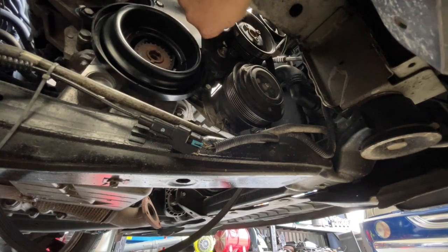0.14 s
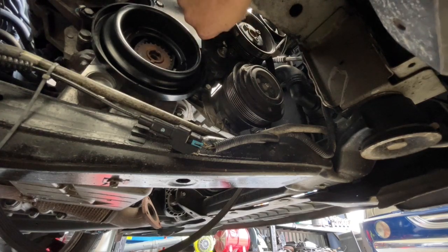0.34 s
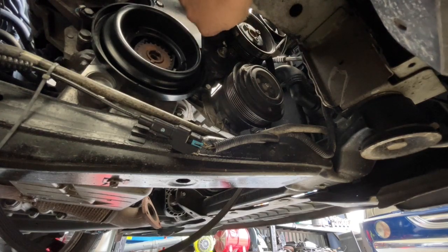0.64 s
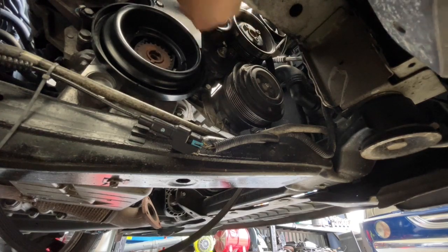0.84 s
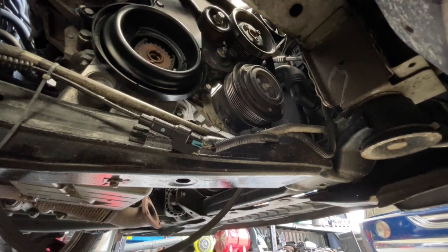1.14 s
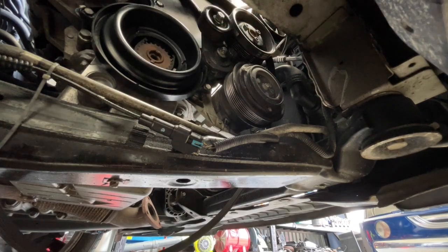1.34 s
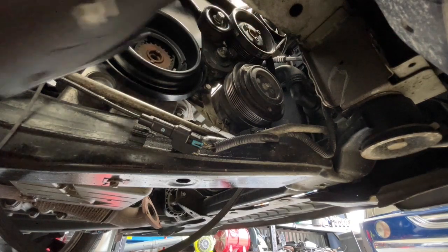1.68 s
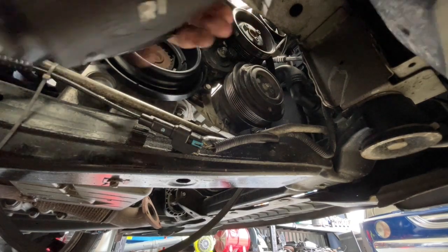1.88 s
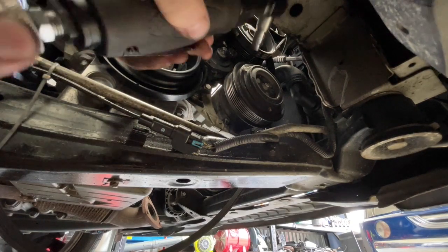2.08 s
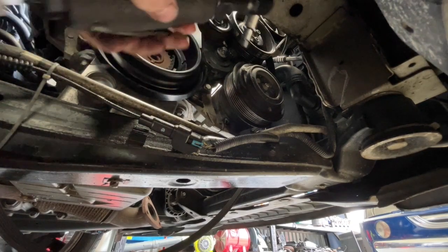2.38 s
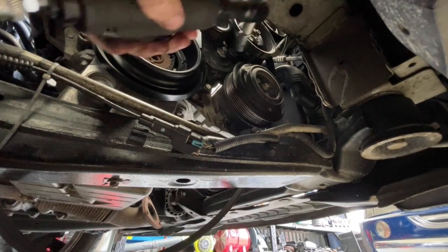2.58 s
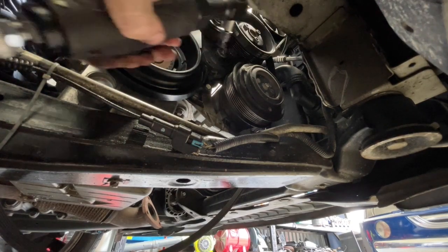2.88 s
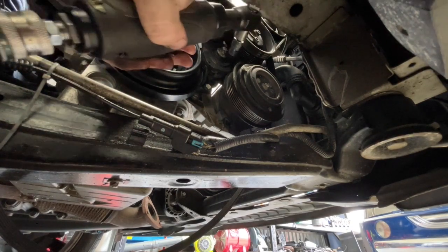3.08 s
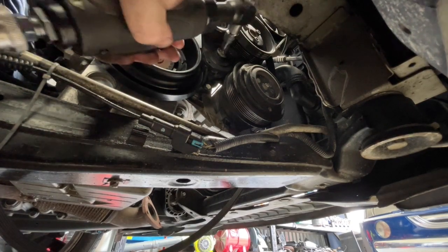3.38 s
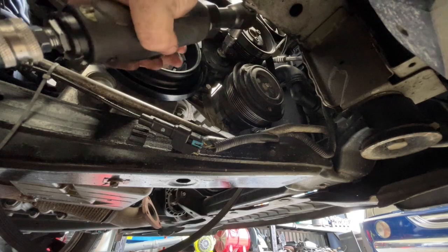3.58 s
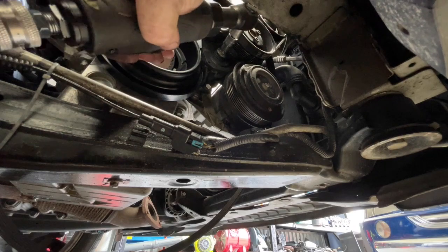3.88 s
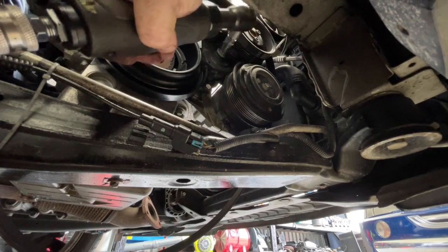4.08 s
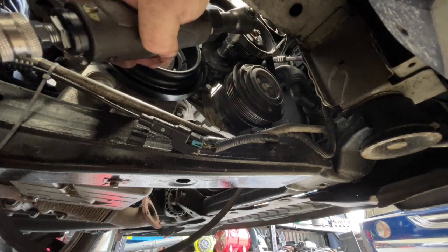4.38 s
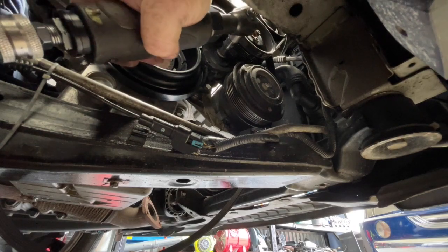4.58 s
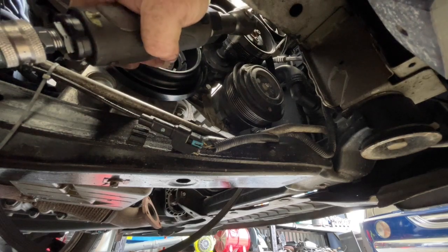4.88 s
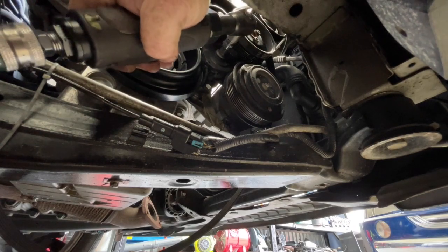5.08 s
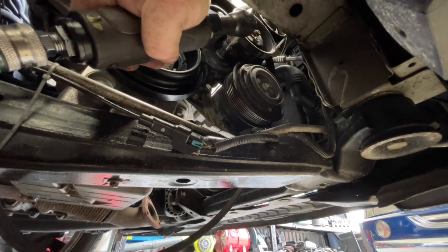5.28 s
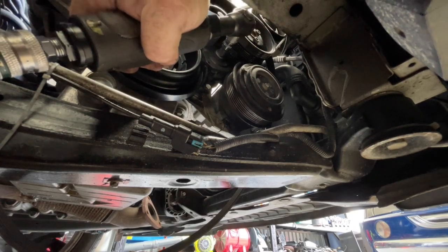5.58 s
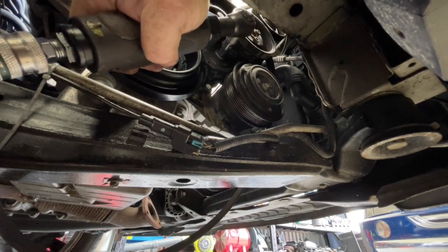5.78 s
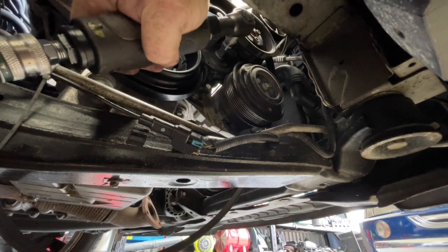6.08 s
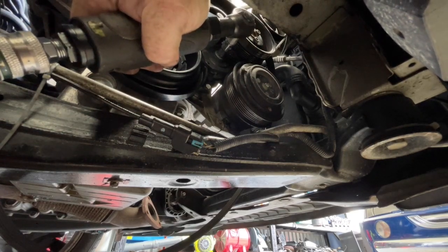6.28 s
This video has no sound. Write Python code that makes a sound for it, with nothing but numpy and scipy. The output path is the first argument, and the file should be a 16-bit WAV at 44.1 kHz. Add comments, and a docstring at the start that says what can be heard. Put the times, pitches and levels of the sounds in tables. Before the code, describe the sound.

A pneumatic ratchet works on a bolt beneath a car, close to the microphone and a little to the left. First come soft rustles, hose bumps and small clicks over a low garage hum, then a sharp steel clack and a few dull kicks of the motor. Three quick bursts of air hiss and whine follow, each coasting down, and finally a sustained run whose pitch droops as its hiss eases.

```python
"""A pneumatic ratchet undoes a bolt under a car, close up and a little to the left.
Its vane motor chops air into hiss and whine: one loaded burst and two free ones, each coasting down
with a falling whoop, then a long run whose pitch sags while its hiss gradually fades.
Before that, sleeve and hose rub past, the socket clacks onto the ringing bolt and the trigger is
feathered. Underneath lies a low workshop drone that sinks away once the motor runs."""
import sys
import numpy as np
from scipy import signal
from scipy.fft import rfft, irfft
from scipy.io import wavfile
from scipy.ndimage import uniform_filter1d

SR = 44100
rng = np.random.default_rng(int(sys.argv[2]) if len(sys.argv) > 2 else 0)


def file_out(sig):
    """Save sig as 16-bit WAV at sys.argv[1]."""
    # one column per channel
    cols = np.atleast_2d(sig).T
    # limit, then scale
    lim = np.clip(cols, -1, 1)
    pcm = np.round(lim * 32767).astype(np.int16)
    wavfile.write(sys.argv[1], SR, pcm)


N = 283959
T = np.arange(N) / SR
HZ = np.fft.rfftfreq(N, 1 / SR)

VANES_PER_CRANK, LOADED_WAVER = 23.2, .009  # gearing; rms share of speed wobble at full load
# Trigger pulls: (press [s], release [s], valve opening [s], spin-up [s], spin-up curve [exponent],
# top vane rate before sag [Hz], base hiss [dB], base chuff [dB], opening surge [dB], base whoop [dB])
TRIGGER_PULLS = [(3.866, 4.033, 0.0069, 0.038, 1.2, 1256, -13.5, -24, 7.5, -10),
                 (4.326, 4.587, 0.0053, 0.044, 1.65, 1876, -14, -27.5, 11, -20.5),
                 (4.722, 4.979, 0.03, .037, 1.55, 1815, -12, -25.5, 4, -18.5),
                 (5.062, 6.5, 0.04, 0.038, 1.6, 1765, -15, -29.5, 3.5, -15)]


def ratchet():
    """The hero sound: air spins a vane motor, each pull taking over from the one dying away."""
    vane_hz, hiss, chuff, whine_gain, whoop_gain = np.max([pull(*row) for row in TRIGGER_PULLS], axis=0)
    load = np.clip((1750 - vane_hz) / 550, .2, 1)  # a slow motor is a labouring one
    cycles = np.cumsum(vane_hz * (1 + LOADED_WAVER * load * wander(26))) / SR  # one per vane
    crank = cycles / VANES_PER_CRANK % 1
    air = exhaust(hiss, chuff, cycles, crank, load)
    snaps = pawl(chuff, crank, load)
    highs = whine(whine_gain, vane_hz, cycles, load)
    lows = whoop(whoop_gain, cycles)
    direct = air + snaps + air_blasts()
    return from_left(direct + bay(highs, wet_db=-2.5, decay_s=.011) + bay(lows, wet_db=-9.5, decay_s=.02))


VALVE_CURVE, SURGE_S = 2.07, .08  # the valve cracks open slowly, then all at once with a surge
START_HZ, STALL_HZ = 111, 170  # vane rate at the first gulp of air; rate below which the tone dies
SETTLE_S, SETTLE_LIMIT = 1.0, .65  # during a pull the pitch sags and the air noise fades, then both hold
SAG_SHARE, HISS_FADE_DB, CHUFF_FADE_DB = .225, -11, -4.5  # per unit of settling
COAST_S, WHOOP_RISE_S, HISS_FALL_DB_PER_S, CHUFF_FALL_DB_PER_S = .042, .0068, 449, 282  # on release
# Body of the vane tone under air: (vane rate [Hz], level against the hiss [dB])
TONE_UNDER_AIR = [(150, -25), (350, -10.5), (660, -9), (930, -10.5), (1060, -49.5), (1210, -16.5),
                  (1450, -38.5), (1640, -33), (1780, -18), (1830, -19.5)]
# Body of the vane tone when coasting: (vane rate [Hz], level against the base whoop [dB])
TONE_COASTING = [(130, -44), (250, -25), (430, -10.5), (800, 1.5), (1100, 3.5), (1750, -8)]


def pull(press, release, valve_s, spin_up_s, spin_curve, top_hz, hiss_db, chuff_db, surge_db, whoop_db):
    """Pitch and gain envelopes of one pull: the valve opens, the rotor spins up, sags and coasts."""
    held = np.clip(T - press, 0, release - press)
    coasted = np.maximum(T - release, 0)
    valve = 1 - np.exp(-(held / valve_s) ** VALVE_CURVE)
    settled = np.minimum(1 - np.exp(-held / SETTLE_S), SETTLE_LIMIT)
    spin = 1 - np.exp(-(held / spin_up_s) ** spin_curve)
    driven_hz = (START_HZ + (top_hz - START_HZ) * spin) * (1 - SAG_SHARE * settled)
    vane_hz = (T > press) * driven_hz * np.exp(-coasted / COAST_S)
    air = valve * amp(surge_db * np.exp(-held / SURGE_S))
    hiss = air * amp(hiss_db + HISS_FADE_DB * settled - HISS_FALL_DB_PER_S * coasted)
    chuff = air * amp(chuff_db + CHUFF_FADE_DB * settled - CHUFF_FALL_DB_PER_S * coasted)
    whine_gain = hiss * spin ** 3  # comes in only near top speed
    shut = 1 - np.exp(-(coasted / WHOOP_RISE_S) ** 2)
    driven = (1 - shut) * hiss * amp(curve(TONE_UNDER_AIR, vane_hz))
    coasting = shut * amp(whoop_db + curve(TONE_COASTING, vane_hz))
    whoop_gain = (driven + coasting) * np.minimum(vane_hz / STALL_HZ, 1) ** 2
    return vane_hz, hiss, chuff, whine_gain, whoop_gain


# Bright air leaving the muffler: (frequency [Hz], relative level [dB])
EXHAUST_EQ = [(100, -18), (500, -21.5), (1200, -16), (2000, -13), (2500, -7), (3500, -9.5), (4150, -8),
              (4900, -11.5), (7200, -9.5), (8600, -4), (10700, 0), (11700, -3), (12500, -14.5),
              (13300, -32.5)]


def exhaust(hiss, chuff, cycles, crank, load):
    """Each vane lets out a puff, hiss on top and chuff below; the crank loads the motor once a turn."""
    stroke = 1 + .23 * load * np.cos(2 * np.pi * crank)
    puffs = unit(1 + .13 * np.cos(2 * np.pi * cycles)) * amp(.5 * wander(310)) * stroke
    top = hiss * noise(eq(EXHAUST_EQ) * band(5400, 26000))
    body = chuff * amp(1) * noise(eq(EXHAUST_EQ) * band(43, 6200))
    return (top + body) * puffs


# Peaks and dips that the vane overtones glide through: (frequency [Hz], relative level [dB])
WHINE_EQ = [(1800, -25), (2200, -9), (2430, -43), (2700, -6), (3050, -24), (3200, -23.5), (3450, -34),
            (3620, -27), (3800, -24), (4700, -28), (5300, -33), (6100, -21), (7400, -30), (8500, -10),
            (9100, -16.5), (9700, -12), (12500, -61)]


def whine(gain, vane_hz, cycles, load):
    """At speed the puffs fuse into a whine; its overtones swell and fade gliding through fixed peaks."""
    overtones = sum(eq(WHINE_EQ, k * vane_hz) * np.cos(2 * np.pi * k * cycles) for k in range(2, 7))
    # four unequal vanes add faint lines at multiples of the shaft speed
    shaft = sum(amp(-31 - 2.5 * np.log2(k)) * np.cos(2 * np.pi * (k * cycles / 4 + rng.random()))
                for k in range(2, 30) if k % 4)
    bite = amp(2.9 * wander(34) + 3.4 * (load + .5))  # flickers, and is louder under load
    return gain * (np.sqrt(2) * overtones + shaft) * bite


FLOOR_ECHO_S, FLOOR_ECHO_DB = .017, -18


def whoop(gain, cycles):
    """Starting and coasting, the rotor pumps round pulses: a gliding tone that slaps off the floor."""
    pulses = sum(amp(-15 * np.log2(k)) * np.cos(2 * np.pi * k * cycles) for k in range(1, 5))
    tone = gain * np.sqrt(2) * pulses * amp(1.4 * wander(160))
    return tone + amp(FLOOR_ECHO_DB) * np.interp(T - FLOOR_ECHO_S, T, tone)


# Last ticks of the pawl as the rotor runs down: (time [s], level [dB], decay [s])
RUN_DOWN_SNAPS = [(4.079, -19, 0.011), (4.100, -14.5, 0.0028), (4.662, -30.5, 0.0064), (4.685, -40, .007),
                  (4.704, -36, 0.015), (5.025, -17.5, 0.004)]


def pawl(chuff, crank, load):
    """The geared crank swings the pawl: one bright snap a turn, harder under load."""
    snaps = chuff * load ** 2 * np.exp(-crank / .07) + hits(RUN_DOWN_SNAPS, rise_s=.001)
    return snaps * noise(eq(EXHAUST_EQ) * band(1500, 13000))


# Thump of air at the head of each pull: (time [s], level [dB], decay [s])
BLAST_HITS = [(3.872, -5.5, 0.011), (4.335, -7, 0.011), (4.724, -27.5, 0.02), (5.07, -30.5, 0.011)]
# Its bass-heavy colour: (frequency [Hz], relative level [dB])
BLAST_EQ = [(20, -15), (45, 2), (75, 2.5), (130, -2.5), (280, 2.5), (480, 1.5), (800, -5.5), (1500, -27),
            (4000, -50)]


def air_blasts():
    """Air slams into the rotor as the valve opens."""
    return hits(BLAST_HITS, rise_s=.00057) * noise(eq(BLAST_EQ) * band(42, 8000))


# Kicks of the rotor as the trigger is feathered: (time [s], level [dB], decay [s])
ROTOR_KICKS = [(3.1325, -17, 0.016), (3.206, -25.5, .012), (3.383, -11.5, 0.018)]
# Their dull puff of air: (frequency [Hz], relative level [dB])
KICK_EQ = [(60, -23), (180, 2), (330, -1.5), (550, 2), (780, -1), (1300, -15), (2200, -14.5), (3500, -29),
           (6000, -48)]


def feathered_trigger():
    """A gulp of air kicks the rotor round briefly: a dull clunk with a rough, falling pitch."""
    starts = np.array(ROTOR_KICKS)[:, 0]
    latest = np.maximum(np.searchsorted(starts, T) - 1, 0)
    age = abs(T - starts[latest])
    vane_hz = 620 * np.exp(-age / .075) * (1 + .1 * wander(200))
    cycles = np.cumsum(vane_hz) / SR
    rotor = amp(-1) * bay(np.cos(2 * np.pi * cycles), wet_db=-4, decay_s=.0075)
    puff = amp(-.5) * noise(eq(KICK_EQ))
    return from_left(hits(ROTOR_KICKS, rise_s=.0018) * (rotor + puff))


# Hard crack of steel on steel: (frequency [Hz], relative level [dB])
CLACK_EQ = [(150, -5), (400, -9), (800, -15), (1300, 7), (2500, -5.5), (5000, -0.5), (7000, -3), (11500, 2),
            (13500, -36.5)]


def socket():
    """Steel cracks against the bolt head and the brackets around it clang."""
    crack = hits([(2.3555, -4, .0083)], rise_s=.0022) * noise(eq(CLACK_EQ))
    brackets = hits([(2.359, -3, .012)], rise_s=.00038) * noise(eq(CLACK_EQ) * band(130, 2970))
    return crack + brackets


# Modes of socket, bolt and pulley: (frequency [Hz], relative level [dB], t60 [s])
BOLT_MODES = [(185.5, -20.5, 1), (326, -23, 0.52), (627, -2.5, 0.12), (968, -1, 0.13), (1334, -16.5, 0.072),
              (1610, 3, .06), (1800, -10, 0.11), (2110, -15, 0.064), (2660, 3, 0.049), (2998, -16.5, 0.021),
              (3870, -19, 0.034), (4000, -5, 0.091)]


def bolt():
    """Bolt and pulley ring briefly under the socket's blow."""
    age = np.maximum(T - 2.3595, 0)
    return amp(-14.5) * from_left(ring(BOLT_MODES, age))


GRAINS_PER_S = 5500
# Hand and sleeve moves: (peak time [s], rise [s], fall [s], muffled rustle [dB], bright scrape [dB])
SLEEVE_MOVES = [(.02, 0.068, 0.09, -65, -59), (.14, 0.083, 0.15, -49, -82),
                (0.517, 0.0093, 0.18, -42.5, -66), (.83, 0.08, .12, -76, -57),
                (0.956, 0.046, 0.032, -38.5, -42.5), (1.155, 0.018, 0.26, -49.5, -52.5),
                (1.32, 0.098, 0.3, -36, -47.5), (1.438, 0.031, 0.24, -28, -38.5),
                (1.78, .17, 0.15, -30, -36.5), (2.05, 0.082, 0.21, -37.5, -50.5),
                (2.58, 0.38, .11, -46.5, -48)]
# Colour of the friction: (frequency [Hz], relative level [dB])
RUB_EQ = [(120, -12.5), (190, 3), (270, -22), (360, 3.5), (520, -9.5), (850, -7.5), (1400, -16.5),
          (3000, -17.5), (7000, -26.5), (11500, -19), (13200, -58)]


def rubbing():
    """Skin and cloth stick and slip in small grains, with one quick swipe among the strokes."""
    peaks, rises, falls, rustle_db, scrape_db = np.transpose(SLEEVE_MOVES)
    grain_gain = amp(2.2 * np.minimum(rng.exponential(1, N), 4))
    grains = grain_gain * (rng.random(N) < GRAINS_PER_S / SR)
    muffled = noise(eq(RUB_EQ) * band(120, 2500), grains, ripple_db=4)
    bright = noise(eq(RUB_EQ) * band(2650, 16000), grains)
    rustle = swells(peaks, rises, falls, rustle_db) * muffled
    scrape = swells(peaks, rises, falls, scrape_db) * bright
    swipe = amp(-28) * np.exp(-abs(T - .955) / .0055) * noise(eq(EXHAUST_EQ) / np.sqrt(HZ + 1500))
    return (rustle + scrape) * amp(wander(27)) + swipe


# Light clicks of trigger, socket and hose coupling: (time [s], level [dB], decay [s])
CLICK_HITS = [(0.951, -36.5, 0.0046), (1.143, -46.5, 0.024), (1.293, -34.5, 0.028), (1.378, -33, 0.017),
              (1.422, -25.5, 0.014), (1.605, -28, .005), (1.669, -25.5, 0.0046), (1.727, -24.5, 0.01),
              (2.911, -22.5, 0.0086), (3.113, -23.5, 0.002), (3.13, -35, 0.0043), (3.204, -41.5, 0.0026),
              (3.358, -19.5, 0.0075), (3.381, -21, 0.0076), (3.455, -42, 0.015), (3.601, -42, 0.0061)]
# Their thin metallic colour: (frequency [Hz], relative level [dB])
CLICK_EQ = [(400, -19), (900, -16), (1300, 4.5), (1900, -4.5), (2600, -5.5), (3200, 1), (4100, -5),
            (5500, -7), (7200, -13.5), (9000, -14), (11500, -6), (13500, -52)]
# Modes of the ratchet's steel head: (frequency [Hz], level against the click [dB], t60 [s])
HEAD_MODES = [(1307, -9, 0.096), (2820, -10.5, 0.018), (4130, -17, 0.11)]


def metal_clicks():
    """Loose metal parts click, and each click leaves a short ring in the steel head."""
    clicks = hits(CLICK_HITS, rise_s=.0018) * noise(eq(CLICK_EQ))
    blows = np.zeros(N)
    for start, db, _ in CLICK_HITS:
        blows[round(start * SR)] = amp(db)
    return clicks + signal.oaconvolve(blows, ring(HEAD_MODES, T[:SR // 5]))[:N]


DRONE_DB, HUM_DB, HUM_HZ = -40, -41.5, 99.5  # levels before the bed sinks
SINK_AT_S, SINK_S, SINK_DB, SINK_DB_PER_S = 3.85, .29, -13, 3  # a quick duck, then a slow fade
# Soft, low bumps of hose and arm: (peak time [s], rise [s], fall [s], level [dB])
HOSE_BUMPS = [(0.998, .04, 0.18, -33.5), (1.47, .1, 0.47, -29.5), (1.77, 0.09, 0.045, -28),
              (2.019, 0.057, 0.12, -28.5)]
# Low end shared by drone and bumps: (frequency [Hz], relative level [dB])
RUMBLE_EQ = [(20, -34.5), (35, -21.5), (52, -6.5), (76, 1.5), (110, -7), (170, -15), (300, -16), (600, -59)]
# Room tone of still air: (frequency [Hz], relative level [dB])
ROOM_TONE_EQ = [(120, 0), (300, -15.5), (450, -6), (1000, -10), (2000, -17.5), (4000, -28.5), (7000, -32),
                (9000, -26.5), (11500, -108), (13500, -74)]


def workshop():
    """The bed: room tone and handling rumble, with a drone and mains hum that sink once the motor runs."""
    since = np.maximum(T - SINK_AT_S, 0)
    sink = amp(SINK_DB * np.minimum(since / SINK_S, 1) - SINK_DB_PER_S * since)
    rumble_gain = np.hypot(amp(DRONE_DB) * sink, swells(*np.transpose(HOSE_BUMPS)))
    hum = amp(HUM_DB) * sink * np.sin(2 * np.pi * HUM_HZ * T + .52 * wander(6.5))
    rumble = rumble_gain * noise(eq(RUMBLE_EQ))
    room_tone = amp(-54) * noise(eq(ROOM_TONE_EQ) * band(110, 12500))
    return rumble + hum + room_tone


# Reverb time of the workshop: (frequency [Hz], t60 [s])
WORKSHOP_T60 = [(100, 0.65), (500, 2.6), (1500, 1.3), (6000, 2.3), (12000, 0.99)]


def workshop_reverb(x):
    """The room's long, mid-forward tail, each band dying at its own speed."""
    hz, t, bands = signal.stft(rng.standard_normal((2, 2 * SR)), SR, nperseg=256)
    colour = eq([(100, .5), (500, .5), (1400, 10.5), (4000, 2), (8000, -5), (12000, -7)], hz)[:, None]
    decay = amp(-60 * t / curve(WORKSHOP_T60, hz)[:, None])
    bloom = 1 - np.exp(-t / .062)
    tail = signal.istft(bands * colour * decay * bloom, SR, nperseg=256)[1]
    return signal.fftconvolve(x.mean(0)[None], tail / np.linalg.norm(tail[0]), axes=1)[:, :N]


def bay(x, wet_db, decay_s):
    """Adds early reflections from the engine bay, different on each side."""
    t = T[:4000]
    taps = rng.standard_normal((2, len(t))) * (rng.random((2, len(t))) < .05)
    taps *= np.exp(-t / decay_s) * (t > .001)
    taps *= amp(wet_db) / np.linalg.norm(taps, axis=1, keepdims=True)
    taps[:, 0] = 1  # the direct sound
    return signal.oaconvolve(x[None], taps / np.hypot(1, amp(wet_db)), axes=1)[:, :N]


# Pan of the tool: (frequency [Hz], left minus right [dB])
TOOL_PAN = [(100, 7), (300, 2.5), (550, 11), (1000, 7.5), (1700, 4.5), (2300, 6.5), (3800, 3.5),
            (4800, 6.5), (7000, 2.5), (8500, -1.5)]
# Its phase between the sides: (frequency [Hz], lead of the left [rad])
TOOL_PHASE = [(100, 0.4), (500, 0), (1100, 2.5), (2000, 0.2), (3200, -1.5), (7500, -1.7), (8500, -1.5)]


def from_left(x):
    """Places a sound where the tool is, by level and phase at constant power."""
    ratio = amp(-curve(TOOL_PAN))
    sides = np.array([np.ones(len(HZ)), ratio * np.exp(-1j * curve(TOOL_PHASE))])
    return shaped(x, sides * np.sqrt(2 / (1 + ratio ** 2)))


# Stereo image of the noise layers: (frequency [Hz], left-right coherence [0-1])
COHERENCE = [(150, 0.98), (400, 0.15), (800, 0.18), (2000, 0.29), (3500, 0.55), (5000, 0.29), (7500, 0.69),
             (8500, 0.305)]


def noise(colour, grains=1, ripple_db=1.5):
    """Coloured stereo noise with an rms of 1, rippled by standing waves under the car."""
    left, other = rfft(rng.standard_normal((2, N)) * grains)
    alike = curve(COHERENCE)
    right = alike * left + np.sqrt(1 - alike ** 2) * other
    ripple = unit(uniform_filter1d(rng.standard_normal(len(HZ)), size=300)) * np.minimum(HZ / 500, 1)
    return unit(irfft(np.array([left, right]) * colour * amp(ripple_db * ripple), N))


def hits(rows, rise_s):
    """Envelope of blows with a fast attack; rows are (time [s], level [dB], decay [s])."""
    ages = [np.maximum(T - row[0], 0) for row in rows]
    return sum(amp(db) * (1 - np.exp(-age / rise_s)) * np.exp(-age / decay_s)
               for age, (_, db, decay_s) in zip(ages, rows))


def swells(peaks, rises, falls, levels_db):
    """Envelope of strokes that grow smoothly to a peak and ebb; their powers add."""
    strokes = (amp(db) * np.exp(-np.where(T < peak, ((peak - T) / rise) ** 2, (T - peak) / fall))
               for peak, rise, fall, db in zip(peaks, rises, falls, levels_db))
    return np.sqrt(sum(stroke ** 2 for stroke in strokes))


def ring(modes, age):
    """Struck metal: one dying sine for each mode."""
    return sum(amp(db - 60 * age / t60) * np.sin(2 * np.pi * hz * age) for hz, db, t60 in modes)


def wander(rate_hz):
    """Smooth random modulation with an rms of 1."""
    return unit(shaped(rng.standard_normal(N), 1 / (1 + (HZ / rate_hz) ** 4)))


def band(low_hz, high_hz):
    """Gain of a steep band-pass."""
    return 1 / np.sqrt((1 + (low_hz / (HZ + 1)) ** 12) * (1 + (HZ / high_hz) ** 12))


def shaped(x, gain):
    """Filters by a gain for each frequency."""
    return irfft(rfft(x) * gain, N)


def curve(points, hz=HZ):
    """Joins breakpoints on a log-frequency axis."""
    point_hz, values = np.transpose(points)
    return np.interp(np.log(hz + 1), np.log(point_hz), values)


def eq(points, hz=HZ):
    """Gain of a curve drawn in decibels."""
    return amp(curve(points, hz))


def amp(db):
    """Decibels to gain."""
    return 10 ** (np.asarray(db) / 20)


def unit(x):
    """Scales to an rms of 1."""
    return x / np.sqrt(np.mean(x ** 2) + 1e-20)


def scene():
    """Tool and hands up front in the workshop; the bolt's ring stays dry, so the room's tail is diffuse."""
    near = ratchet() + feathered_trigger() + socket() + rubbing() + metal_clicks()
    return near + bolt() + amp(-26.5) * workshop_reverb(near) + workshop()


HIGH_CUT_HZ = 15900


def record(dry):
    """The top octave narrows to near mono, with a full phase turn on the right; then clip and high cut."""
    left, right = rfft(dry)
    share = np.clip((HZ - 7600) / 900, 0, .93)
    phase_turn = np.exp(2j * np.pi * np.clip((HZ - 8700) / 3100, 0, 1))
    right = ((1 - share) * right + share * left) * phase_turn
    clipped = np.clip(irfft(np.array([left, right]), N), -1, 1)
    high_cut = signal.firwin(511, HIGH_CUT_HZ, window=("kaiser", 9), fs=SR)
    return signal.oaconvolve(clipped, high_cut[None], "same")


dry = scene()
out = record(dry)
file_out(out)
```